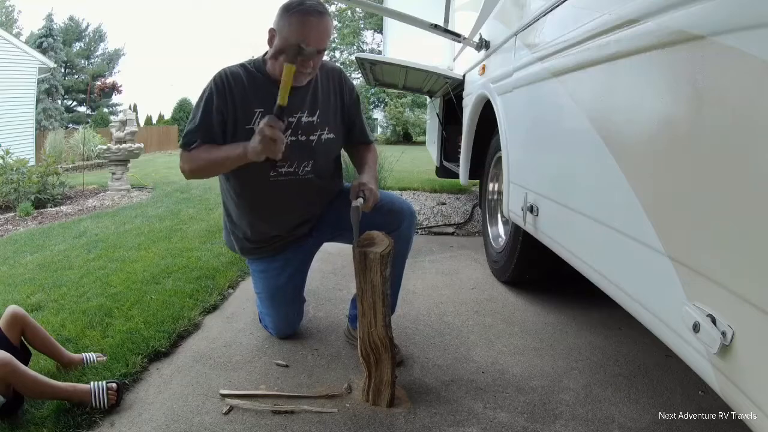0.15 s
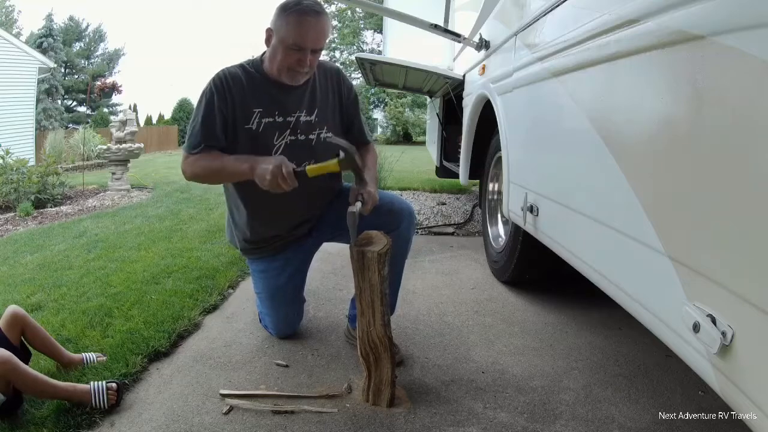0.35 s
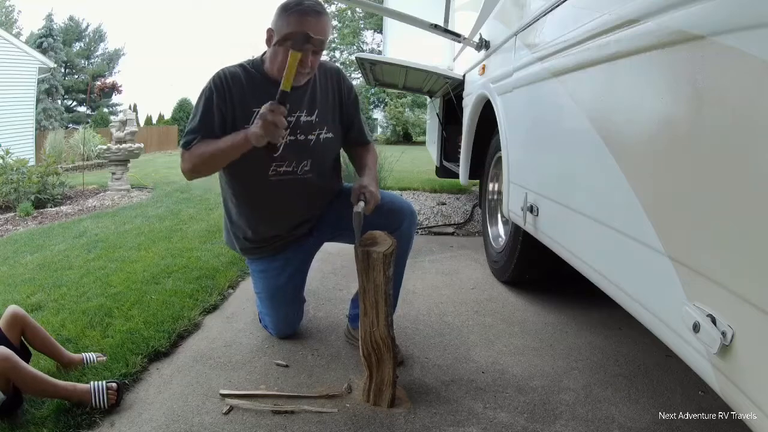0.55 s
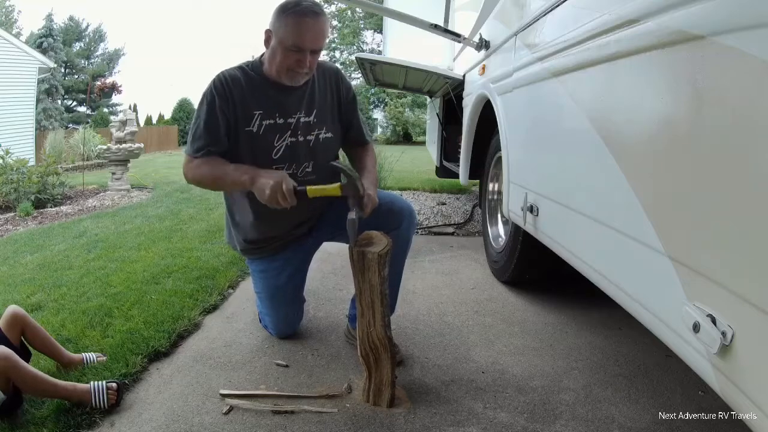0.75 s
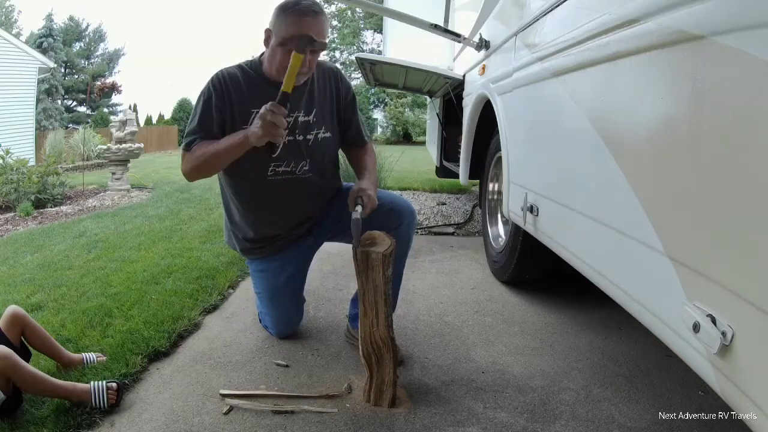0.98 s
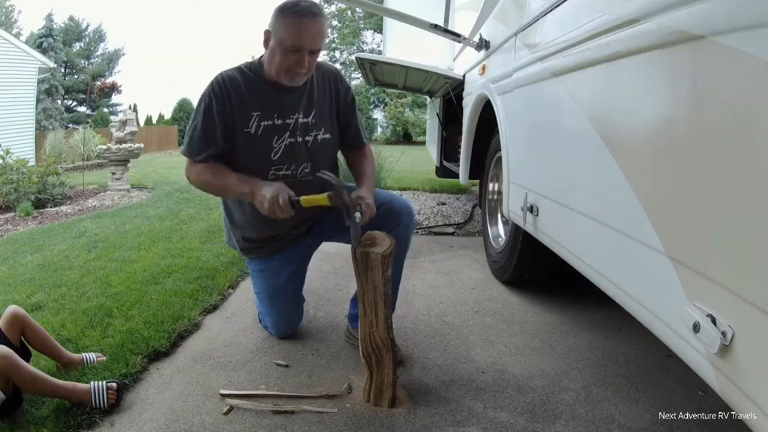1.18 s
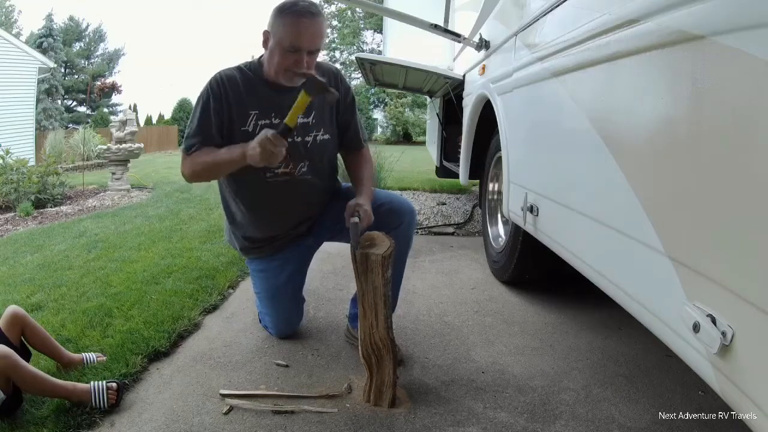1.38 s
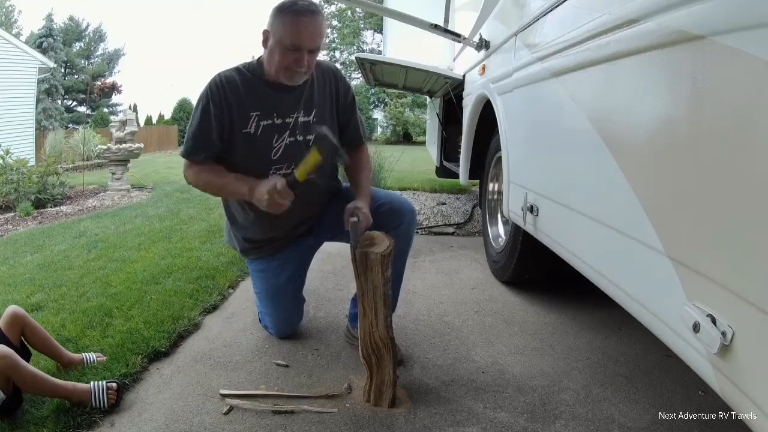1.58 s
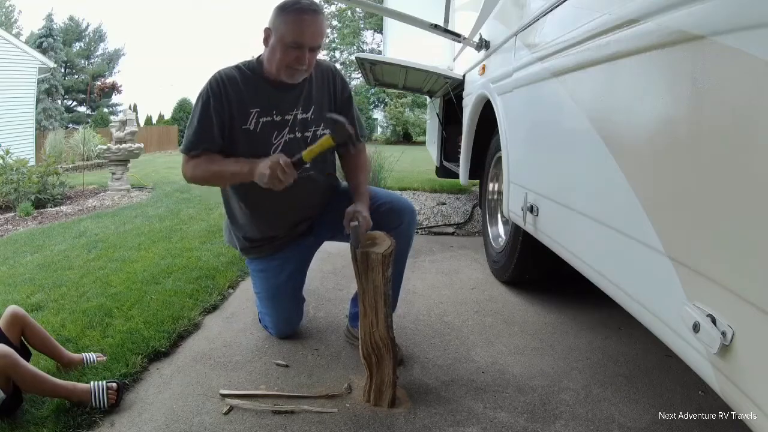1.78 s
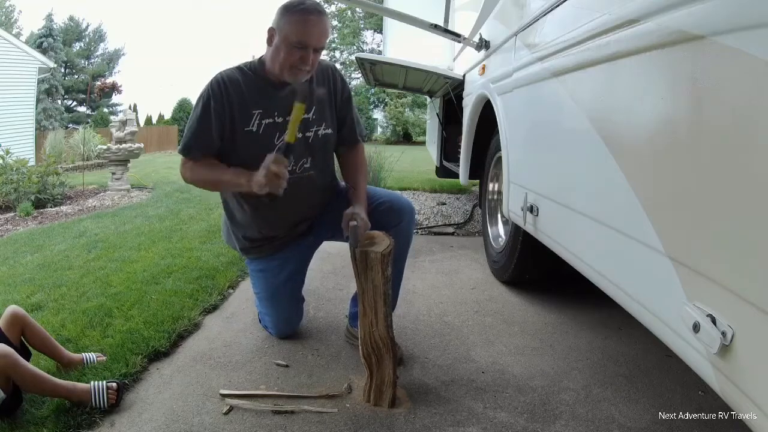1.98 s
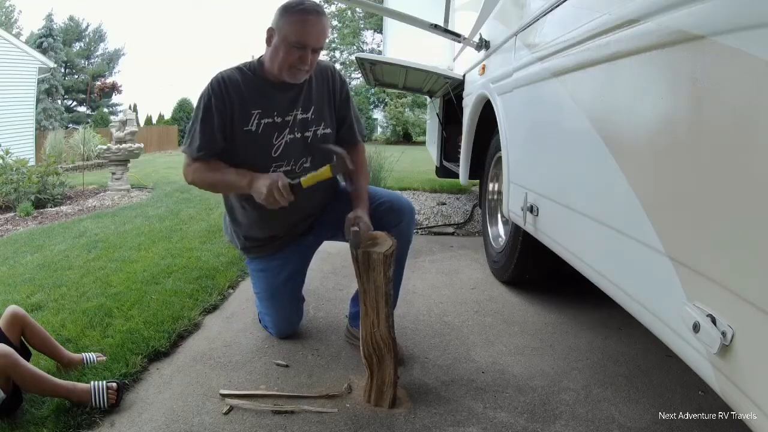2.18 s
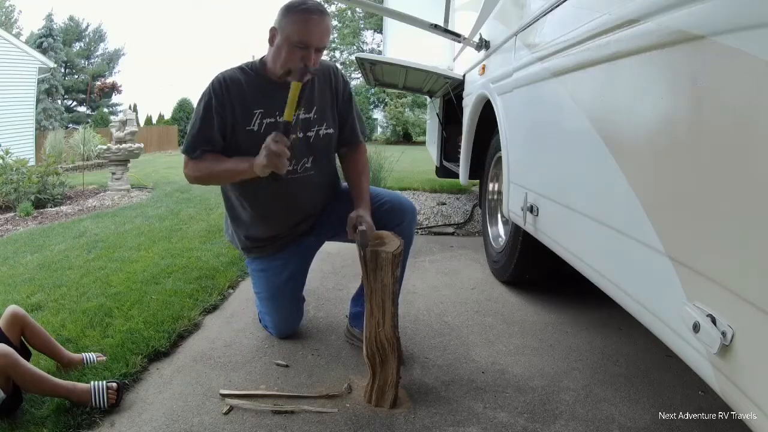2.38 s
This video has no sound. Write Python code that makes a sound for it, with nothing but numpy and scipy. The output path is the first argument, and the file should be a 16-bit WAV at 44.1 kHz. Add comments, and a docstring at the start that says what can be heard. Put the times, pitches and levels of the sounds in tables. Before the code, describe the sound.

Hammer blows on a hatchet set in an upright log, at about 0.2, 0.65, 1.1, 1.6 and 2.0 seconds. Each is a loud, slightly distorted crack with a dull wooden knock and brief bright steel ring, doubled by a nearby camper wall and a faint yard echo. Soft scuffs come first and near 1.0; splitting fibres crackle around 1.25 and very faintly 2.15. Quiet outdoor air and low rumble.

```python
"""A steel hammer drives a hatchet into an upright log: five even blows on a concrete drive beside a camper.
Each blow is a noise crack, a coloured noise knock with log modes, and damped modes of the steel heads.
Fibres snap in noise clusters after blows three and five; soft scuffs before blow one and between two and three.
The camper's flat side repeats crack and knock at once, the yard answers faintly later, over quiet open air.
The blows overload the microphones."""
import sys
import numpy as np
from scipy import signal
from scipy.fft import rfft, irfft, next_fast_len
from scipy.io import wavfile
from scipy.ndimage import map_coordinates

SR = 44100
rng = np.random.default_rng(int(sys.argv[2]) if len(sys.argv) > 2 else 0)


def dump_mix(stems):
    """Bounce the given channels to the path in sys.argv[1] as a 16-bit WAV at rate SR."""
    frames = np.atleast_2d(stems).T  # one column per channel
    limited = np.clip(frames, -1, 1)  # hard clip at full scale
    pcm = np.round(limited * 32767).astype(np.int16)
    wavfile.write(sys.argv[1], SR, pcm)


N = 108045
T = np.arange(SR // 2) / SR  # time within one event [s]

# left-right correlation of the noises: (frequency [Hz], correlation)
ALIKE = [(60, 0.62), (300, 0.48), (700, .93), (1300, .92), (2700, 0.49), (5000, 0.27), (12000, .3)]

KNOCK_DB, CRACK_DB, STEEL_DB, LOG_DB, HAMMER_DB = -6.5, -7.5, -4, -13.5, -44.5
KNOCK_RISE_S, KNOCK_HOLD_S, CRACK_T60_S = .0004, .002, .078
HOLLOW_HZ, HOLLOW_OCT, RESONANCE_OCT = 580, .27, .2
PING_HZ, PING_OCT = 4935, .06
GRAIN_DB, GRAIN_HZ = 1.47, 119.5  # depth and knot spacing of the humps
STEEL_SPREAD_RAD, LOG_SPREAD_RAD = 1.1, .53  # phase spread between microphones
STEEL_BLUR_RAD, LOG_BLUR_RAD, HAMMER_BLUR_RAD, BLUR_PER_S = .7, .58, .6, 100  # phase wander, its rate
MODE_SCATTER_DB = 1.2
STEEL_PAN_DB, LOG_PAN_DB = -2.5, .35  # left minus right
LEFT_LAG_S = .00007
WALL_S, WALL_DB = .012, -8  # camper's side
YARD_DB, STEEL_YARD_DB = -39, -37
TEAR_RISE_S, TEAR_T60_S, TEAR_TOP_HZ = .001, .11, 5400
AIR_DB, RUMBLE_SWAY_DB = -52, 2.5
CLIP_TOP, CLIP_KNEE = .86, 9
TOP_HZ, TOP_ORDER = 12700, 90


def amp(db):
    """Decibels to gain."""
    return 10 ** (np.asarray(db) / 20)


def unit(x):
    """Scale to rms 1."""
    return x / np.sqrt(np.mean(x ** 2) + 1e-20)


def along(points, hz):
    """Read (Hz, value) points on a log-frequency axis."""
    f, v = np.transpose(points)
    return np.interp(np.log(hz + 1), np.log(f + 1), v)


def bell(hz, centre_hz, octaves):
    """Gaussian hump of height 1 on a log-frequency axis."""
    return np.exp(-.5 * (np.log2((hz + 1) / centre_hz) / octaves) ** 2)


def wobble(rate_per_s, size):
    """Smooth random curve through rate_per_s knots a second."""
    knots = rng.standard_normal(1024)
    return map_coordinates(knots, [np.arange(size) * rate_per_s / SR], mode="wrap")


def filtered(x, response):
    """Multiply the spectrum of x by response(hz)."""
    n = x.shape[-1]
    m = next_fast_len(n + 4096)
    hz = np.fft.rfftfreq(m, 1 / SR)
    return irfft(rfft(x, m) * response(hz), m)[..., :n]


def pan(db):
    """Left and right gains for a level difference."""
    return amp(np.array([[db], [-db]]) / 2)


def noise(spectrum, alike, size):
    """Stereo noise of rms 1; the mid-side balance sets the correlation at each frequency."""
    def mid_side(hz):
        turn = np.arccos(np.clip(along(alike, hz), -.99, .99)) / 2
        return amp(along(spectrum, hz)) * np.array([np.cos(turn), np.sin(turn)])

    mid, side = filtered(rng.standard_normal((2, size)), mid_side)
    return unit(np.array([mid + side, mid - side]))


def decay(t60_s):
    """Exponential fade."""
    return amp(-60 * T / t60_s)


def dying(x, t60s, hold_s):
    """After a hold, each frequency of x fades at its own rate."""
    hz, t, z = signal.stft(x, SR, nperseg=256)
    fade = np.maximum(t - hold_s, 0) / along(t60s, hz)[:, None]
    return signal.istft(z * amp(-60 * fade), SR, nperseg=256)[1][:, :x.shape[1]]


def ring(modes, blur_rad, apart, spread_rad):
    """Damped modes; scattering blurs their phases, partly differently at each microphone."""
    out = np.zeros((2, len(T)))
    for hz, db, t60_s in modes:
        shared, left, right = (wobble(BLUR_PER_S, len(T)) for _ in range(3))
        phase = 2 * np.pi * (hz * T + rng.random())
        phase = phase + spread_rad * rng.standard_normal((2, 1))
        phase = phase + blur_rad * (shared + apart * np.array([left, right]))
        gain = amp(db + MODE_SCATTER_DB * rng.standard_normal())
        out += gain * decay(t60_s) * np.sin(phase)
    return out


def add(track, s, sound):
    """Mix a sound into the track at s seconds."""
    part = track[:, max(round(s * SR), 0):][:, :sound.shape[1]]
    part += sound[:, :part.shape[1]]


def outdoors(sway_db=1, rumble_hz=80, rumble_db=-58):
    """Quiet open air plus a low, uneven far-off rumble: two noises of slowly swaying level."""
    # open air: (frequency [Hz], relative density [dB per Hz])
    air_spectrum = [(15, -36), (25, -4.5), (48, -7.5), (80, -3.5), (141, -10), (178, -10.5), (256, -16),
                    (513, -15.5), (800, -18.5), (1300, -18), (2000, -21), (2700, -27), (3300, -34.5),
                    (4600, -35), (6000, -51), (12000, -69.5), (16000, -105)]
    # left-right likeness: (frequency [Hz], correlation)
    air_alike = [(50, .6), (300, 0.1), (1000, 0.27), (3000, .1), (8000, 0.26)]
    air = amp(AIR_DB + sway_db * wobble(4.2, N)) * noise(air_spectrum, air_alike, N)
    rumble = unit(filtered(noise(air_spectrum, air_alike, N), lambda hz: bell(hz, rumble_hz, .2)))
    return air + amp(rumble_db + RUMBLE_SWAY_DB * wobble(6, N)) * rumble


def scuffs():
    """Faint scuffs of hand and clothing: Gaussian swells of rustling noise."""
    # swells: (centre time [s], level [dB], Gaussian sigma [s])
    swells = [(0.016, -47, 0.011), (0.092, -57, 0.021), (0.957, -62.5, 0.006), (1.05, -55.5, 0.0047)]
    # rustle: (frequency [Hz], relative density [dB per Hz])
    rustle = [(200, -9), (600, -5), (1600, -5), (4200, -17), (6000, -22), (10000, -53)]
    t = np.arange(N) / SR
    level = sum(amp(db) * np.exp(-.5 * ((t - s) / sigma_s) ** 2) for s, db, sigma_s in swells)
    return noise(rustle, ALIKE, N) * level


def crack():
    """Sharp impact: noise under one exponential fade."""
    # crack: (frequency [Hz], relative density [dB per Hz])
    crack_spectrum = [(100, -21), (600, -11.5), (1400, 6.5), (3000, -3), (5000, 2), (8500, -0.5),
                      (11000, -13), (13000, -22.5)]
    return noise(crack_spectrum, ALIKE, len(T)) * decay(CRACK_T60_S)


def grain(x):
    """Random humps and dips in the spectrum: the many small resonances of split wood."""
    knots = rng.standard_normal(512)
    return unit(filtered(x, lambda hz: amp(GRAIN_DB * map_coordinates(knots, [hz / GRAIN_HZ], mode="wrap"))))


def log_thud():
    """The log's dull knock: grained noise, scattered between ground and camper as it fades."""
    # knock: (frequency [Hz], relative density [dB per Hz])
    knock_spectrum = [(30, -18), (120, -22.5), (220, -14), (350, -10), (650, -9), (1100, 0), (2000, -0.5),
                      (2600, -6.5), (3200, -11), (4100, -6), (5200, -13), (6300, -27), (9000, -31.5),
                      (12500, -37)]
    # scattered decay: (frequency [Hz], t60 [s])
    scatter_t60 = [(100, 0.099), (400, 0.17), (1200, 0.14), (2500, 0.18), (4500, .15), (7000, 0.21),
                   (12000, .07)]
    return dying(grain(noise(knock_spectrum, ALIKE, len(T))), scatter_t60, KNOCK_HOLD_S)


def log_tones():
    """Damped modes of the log with the blade wedged in it."""
    # log modes: (frequency [Hz], relative level [dB], t60 [s])
    log_modes = [(718, -8, 0.067), (822, -11.5, 0.24), (897, -6.5, .16), (1042, -7, .14), (1099, -7.5, .13),
                 (1146, -15.5, .28), (1185, -8, 0.091), (1247.3, .5, 0.13), (1406, -8, .11),
                 (1546, -4, 0.18), (1654, -7, 0.19), (1723, -2, .12), (1860, -6.5, .13), (1980, -7.5, .14),
                 (2187, -5, .12), (2625, -10, .15)]
    return ring(log_modes, LOG_BLUR_RAD, apart=.4, spread_rad=LOG_SPREAD_RAD)


def steel_heads(ping_db):
    """Damped modes of hammer and hatchet heads, weighted around the ping."""
    # steel modes: (frequency [Hz], relative level [dB], t60 [s])
    steel_modes = [(3727, -20, .18), (3880, -8.5, 0.088), (4350, -12, 0.15), (4400, -4, 0.14),
                   (4464, -8, .15), (4930, -5.5, 0.16), (4981, -5, 0.085), (5530, -17.5, 0.13),
                   (6180, -29, .15), (6870, -32.5, .15), (7610, -28.5, 0.13), (8140, -30, 0.17),
                   (8750, -29, 0.13), (9200, -25.5, 0.1)]
    steel = ring(steel_modes, STEEL_BLUR_RAD, apart=.8, spread_rad=STEEL_SPREAD_RAD)
    return filtered(steel, lambda hz: amp(ping_db * bell(hz, PING_HZ, PING_OCT)))


def hammer_head():
    """The hammer head's faint, slowly damped modes."""
    # hammer modes: (frequency [Hz], relative level [dB], t60 [s])
    hammer_modes = [(3960, -7, 0.79), (3987, -8, 0.71), (4538, -5.5, 0.89), (4914, -0.5, 0.43),
                    (5464, -11.5, 0.95), (6180, -24, .55), (6877, -21.5, 0.26), (7585, -15, 0.67),
                    (9070, -17.5, 0.59)]
    return ring(hammer_modes, HAMMER_BLUR_RAD, apart=.71, spread_rad=STEEL_SPREAD_RAD)


def blows():
    """Every blow: crack and log with the camper's echo of crack and thud; and, apart, the ringing steel."""
    # blows: (time [s], level [dB], steel gain [dB], ping gain [dB], crack gain [dB],
    #         hollow low-knock gain [dB], log resonance [Hz], resonance gain [dB])
    hits = [(0.2097, 0, 0, 4, 2, -2, 1150, 5.5), (0.6539, 0, -0.5, 1, -1.5, -4.5, 1800, 1),
            (1.1179, 0, -0.5, -0.5, -1, -6.5, 987, 3.5), (1.5926, 0, -0.5, -3.5, -3.5, 1.5, 1396, -0.5),
            (2.029, -2, 0.5, 2, 3.5, 9.5, 1169, 5)]
    knocks, rings = np.zeros((2, 2, N))
    rise = 1 - np.exp(-T / KNOCK_RISE_S)
    for s, db, steel_db, ping_db, crack_db, hollow_db, log_hz, boost_db in hits:
        def colour(hz):
            hollow = hollow_db * bell(hz, HOLLOW_HZ, HOLLOW_OCT)
            return amp(hollow + boost_db * bell(hz, log_hz, RESONANCE_OCT))

        snap = amp(CRACK_DB + crack_db) * crack()
        log = np.array([amp(KNOCK_DB) * log_thud(), amp(LOG_DB) * log_tones()])
        thud, tones = filtered(log, colour) * pan(LOG_PAN_DB)
        add(knocks, s, amp(db) * rise * (snap + thud + tones))
        add(knocks, s + WALL_S, amp(db + WALL_DB) * rise * (snap + thud))
        steel = steel_heads(ping_db) * pan(STEEL_PAN_DB)
        add(rings, s, amp(db + STEEL_DB + steel_db) * rise * steel)
        add(rings, s, amp(db + HAMMER_DB) * rise * hammer_head())
    return knocks, rings


def yard(x):
    """Faint, dull late answer of houses and trees: convolution with fading noise."""
    # tail decay: (frequency [Hz], t60 [s])
    yard_t60 = [(200, .6), (1500, .75), (4700, 1), (8000, .45), (12000, .25)]
    # tail colour: (frequency [Hz], gain [dB])
    yard_colour = [(200, 0), (2000, -0.5), (3000, -6.5), (5000, -2.5), (7000, -10), (10000, -17.5)]
    tail = dying(rng.standard_normal((2, len(T))), yard_t60, 0)
    tail = filtered(tail / np.linalg.norm(tail[0]), lambda hz: amp(along(yard_colour, hz)))
    return signal.fftconvolve(x, tail, axes=1)[:, :N]


def splinters(snaps_per_s=1100):
    """The split runs on: short random clusters of snapping fibres, muffled by the log around them."""
    # tearing fibres: (time [s], relative level [dB], cluster length [s])
    clusters = [(1.2465, -25.5, .012), (1.261, -30.5, .015), (1.2905, -31, .006), (1.2995, -35.5, .005),
                (1.307, -34.5, .003), (2.134, -38.5, .005), (2.185, -38.5, .006)]
    # tearing: (frequency [Hz], relative density [dB per Hz])
    tear_spectrum = [(100, -34.5), (450, -15), (680, 1.5), (900, -0.5), (1250, 3), (2000, -2), (3000, -9.5),
                     (4200, -10.5), (6000, -21), (10000, -54)]
    out = np.zeros((2, N))
    for s, db, length_s in clusters:
        chance, sizes = rng.random(len(T)), rng.standard_normal(len(T))
        snaps = sizes * (chance < snaps_per_s / SR) * (T < length_s)
        snaps[0] = 2  # a sure first snap
        snaps /= np.linalg.norm(snaps)
        body = noise(tear_spectrum, ALIKE, len(T)) * decay(TEAR_T60_S)
        body *= 1 - np.exp(-T / TEAR_RISE_S)
        add(out, s, amp(db) * signal.fftconvolve(body, snaps[None], axes=1))
    return filtered(out, lambda hz: 1 / np.sqrt(1 + (hz / TEAR_TOP_HZ) ** 8))


def scene():
    """The chopping reaches the right microphone first; the yard is fed more of the steel than of the wood."""
    knocks, rings = blows()
    wood = knocks + splinters()
    sides = np.array([[-1], [1]])  # left late, right early, by half the lag each
    near = filtered(wood + rings, lambda hz: np.exp(1j * np.pi * hz * LEFT_LAG_S * sides))
    late = yard(amp(YARD_DB) * wood + amp(STEEL_YARD_DB) * rings)
    return near + late + scuffs() + outdoors()


def record(dry):
    """The microphones flatten the peaks, dull the top and cut steeply above their band limit."""
    # microphone response: (frequency [Hz], gain [dB])
    mic = [(20, -2), (8000, 0), (10500, 0.5), (12000, -5.5), (13000, -12.5)]
    clipped = dry / (1 + np.abs(dry / CLIP_TOP) ** CLIP_KNEE) ** (1 / CLIP_KNEE)
    return filtered(clipped, lambda hz: amp(along(mic, hz)) / (1 + (hz / TOP_HZ) ** TOP_ORDER))


dry = scene()
out = record(dry)
dump_mix(out)
```